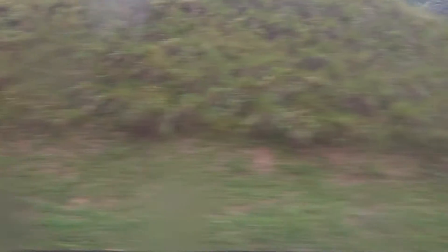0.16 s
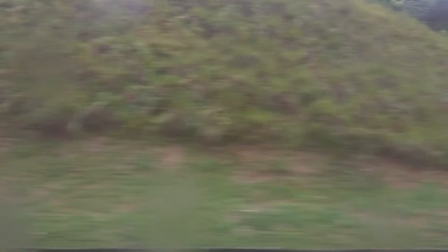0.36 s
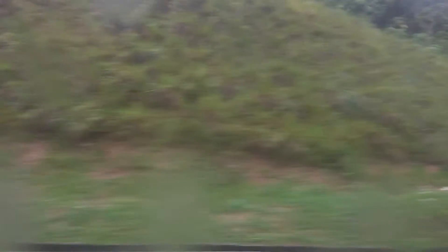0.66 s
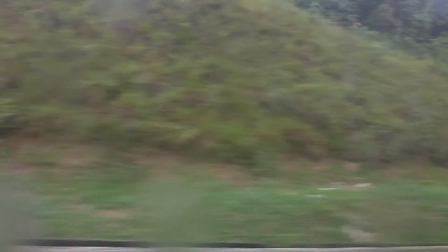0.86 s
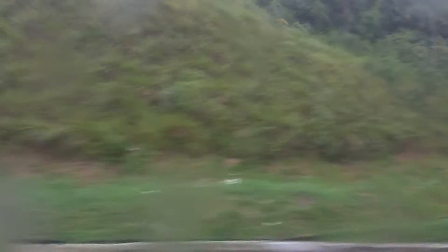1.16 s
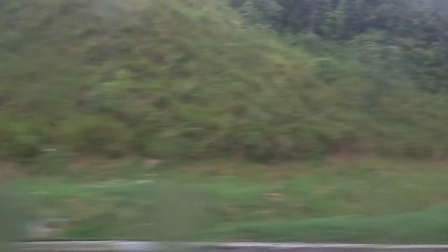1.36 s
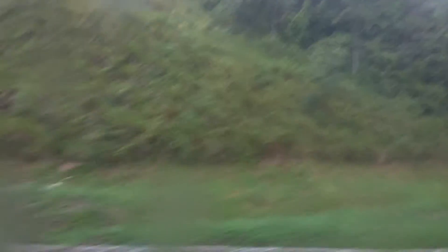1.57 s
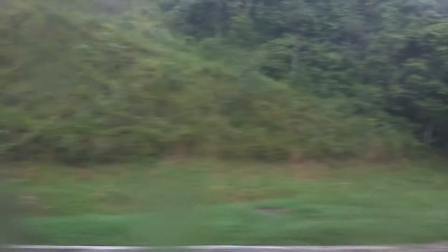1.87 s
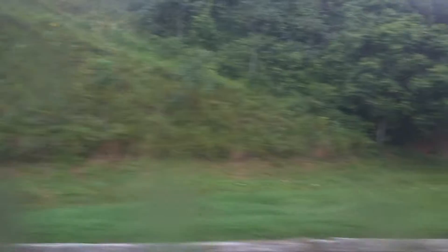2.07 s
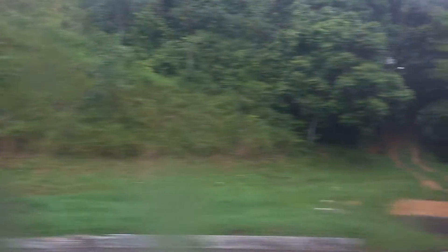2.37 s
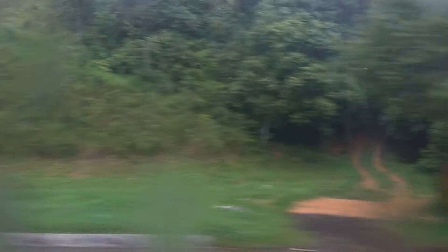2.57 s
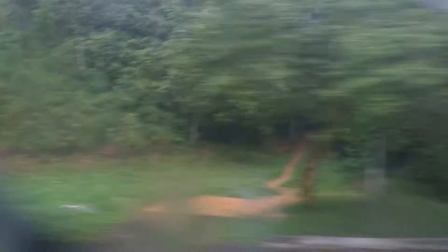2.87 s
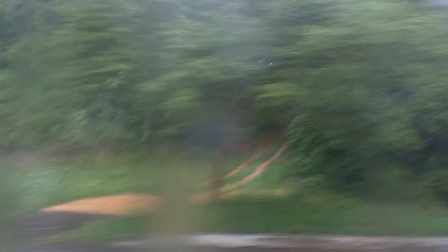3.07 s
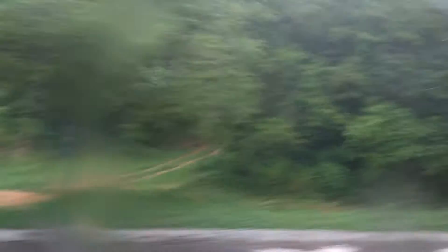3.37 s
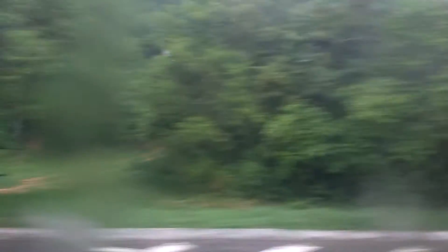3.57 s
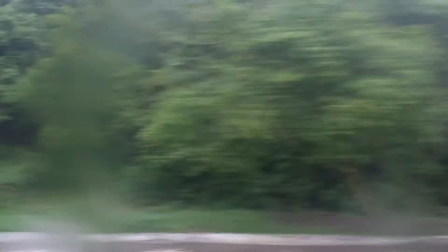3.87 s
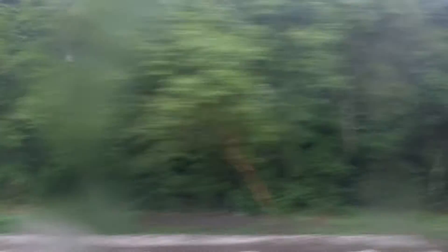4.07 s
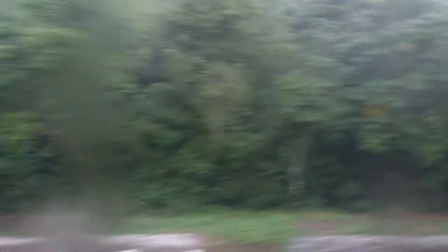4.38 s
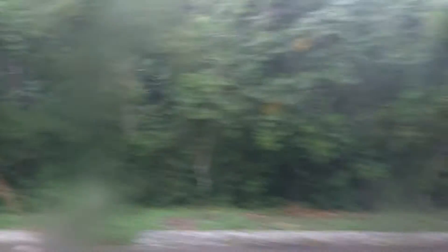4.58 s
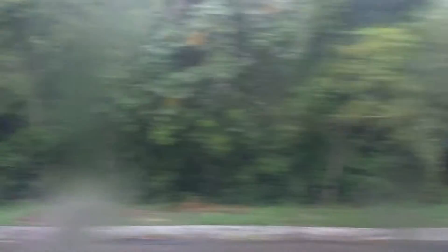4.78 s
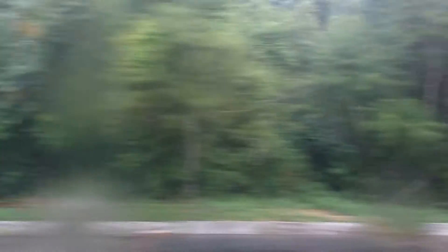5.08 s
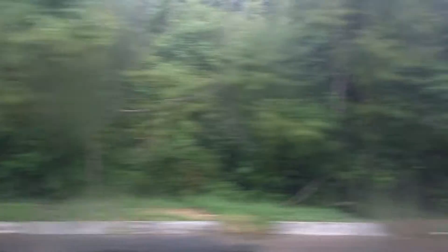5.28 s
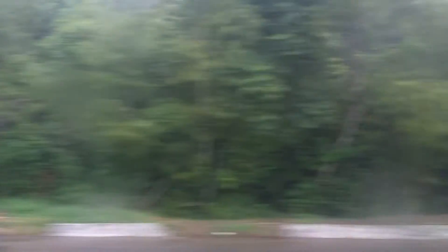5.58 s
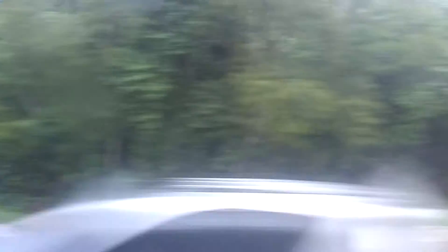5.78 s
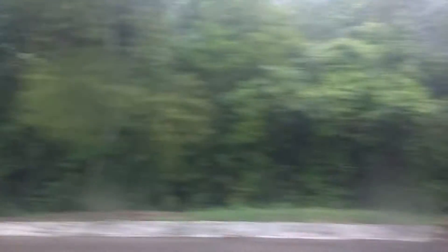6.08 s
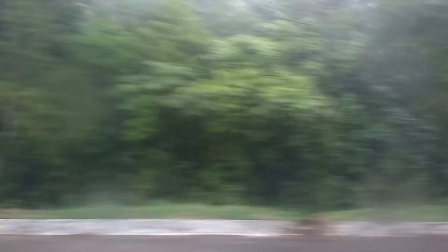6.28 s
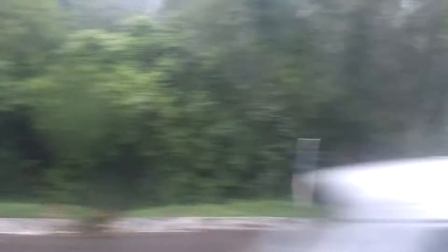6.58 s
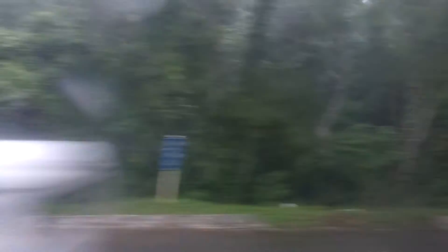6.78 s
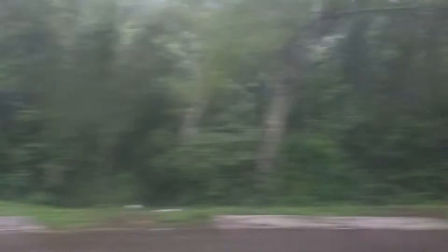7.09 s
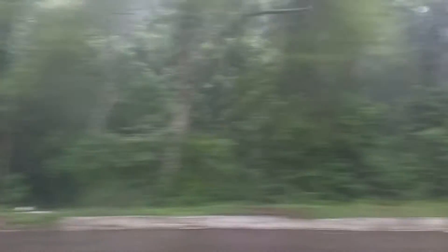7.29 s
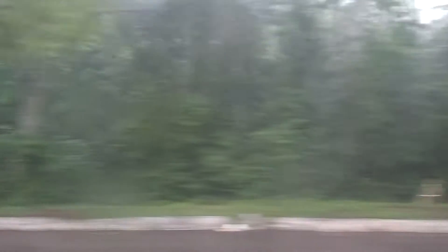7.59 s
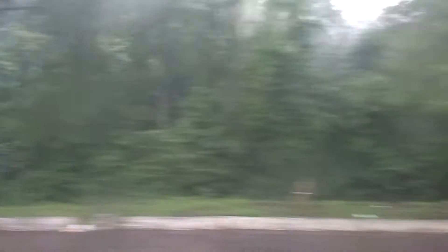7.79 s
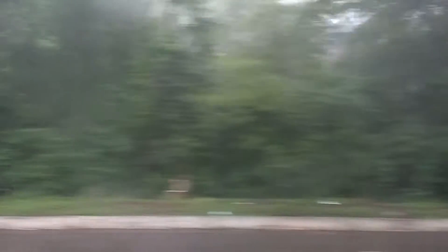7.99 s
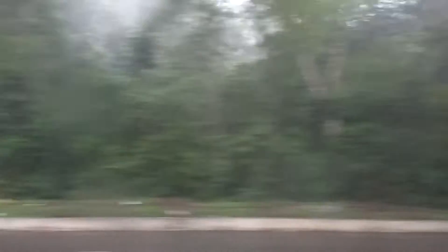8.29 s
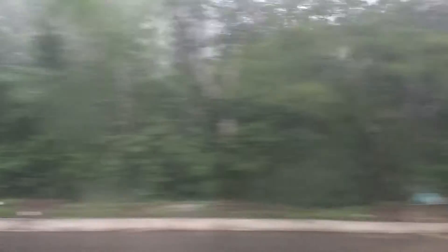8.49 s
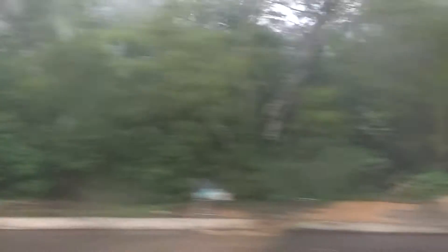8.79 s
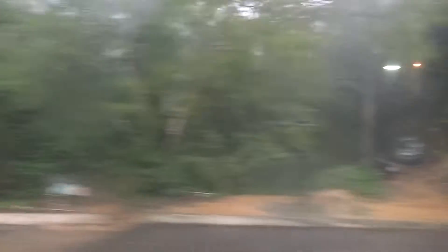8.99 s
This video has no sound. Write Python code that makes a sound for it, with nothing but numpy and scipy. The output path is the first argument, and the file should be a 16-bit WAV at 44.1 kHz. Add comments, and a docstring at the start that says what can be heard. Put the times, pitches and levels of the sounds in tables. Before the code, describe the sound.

A continuous ride inside a diesel vehicle on a wet road. A low boom near 180 Hz, rising slowly to about 195 Hz, beats with a close hum roughly four times a second, above rough engine harmonics and dark tyre rumble with subdued spray. A hard click at 0.3 s briefly pushes the drone down; it recovers within half a second. Rubs and dull knocks gather around 1.6-1.75 s. From 3.1 to 4.6 s handling is busiest, with sharp clicks, knocks and bright rustles, while the engine eases around 3.5-4.4 s. It swells again near 5.2 s. More taps come at 6.5 and 6.9 s, a strong rustle at 7.0, softer rubs at 7.7 and 8.9. A gear whine around 500 Hz grows after 6 s, peaking near 9 s before a sudden dip. Tiny pings, faint right-side crackles and intermittent very high lens whirring run throughout.

```python
"""Inside a diesel vehicle on a wet road: engine orders boom and beat against a hum just above, a gear whine
grows, tyre and spray noise swells in half-octave bands.
A hand-held camera ticks (struck resonances) and rustles (noise bursts), its lens drive sings in the top treble
(steady tones), a small part pings now and then, faint bright ticks crackle on the right.
The camera widens its two microphones by feeding each, late and inverted, into the other."""
import sys
import numpy as np
from scipy import signal
from scipy.fft import rfft, irfft, next_fast_len
from scipy.io import wavfile
from scipy.ndimage import uniform_filter1d

SR = 44100
rng = np.random.default_rng(int(sys.argv[2]) if len(sys.argv) > 2 else 0)


def unload_audio(sound):
    """Save the sound as a 16-bit wav file, at the path given as the first command line argument."""
    columns = np.transpose(np.atleast_2d(sound))
    # keep every value between -1 and 1, then stretch to whole-number steps
    steps = np.round(np.clip(columns, -1, 1) * 32767)
    wavfile.write(sys.argv[1], SR, steps.astype(np.int16))


N = 402633

# Tyre and spray noise spectrum. Each row: frequency in Hz, level in dB per Hz, part not shared by the
# microphones in dB, left minus right in dB.
ROAD_SPECTRUM = [(22, -53, -22, -6), (40, -61.5, -19, -4), (63.7, -49.5, -14, 1.5), (95, -49.5, -15, 0),
                 (132, -45, -23, -1.3), (204, -49, -8.5, -3.5), (307, -59, -5, -1.5),
                 (409, -62.5, -3.5, 0.5), (472, -63.5, -4, -4), (520, -60, -7.5, -5.5),
                 (649, -66.5, -5, -7.5), (1021, -71.5, -1.5, 0), (1615, -82.5, 0.5, -5),
                 (2040, -81.5, 0, -5), (3005, -89.5, -1.5, -4), (5500, -97.5, 8.5, 8),
                 (7400, -102, -7, -22.5), (12000, -101, 1, -6.5), (15000, -99, 19, -3)]
# Air and panel resonances on the road noise. Each row: centre in Hz, width in Hz, gain in dB.
CABIN_RESONANCES = [(656, 70, 2.5), (892, 45, 3.5), (1070, 84, 3.5), (1275, 220, 2.5), (457, 51, -2),
                    (745, 60, 0), (1130, 71, -1)]
# Road noise levels. Each row: time in seconds, body rumble in dB, tyre roar in dB, spray hiss in dB.
ROAD_LEVELS = [(0.0, 1.5, 0, -0.5), (1.0, 3, 0.5, 0), (2.0, -3.5, 0, -1), (3.0, 1, -1, 0.5),
               (4.0, 2.5, -2, -0.5), (5.0, 2.5, 3, 3.5), (6.0, 1.5, 1, 1.5), (7.0, 1.5, 3, 3),
               (8.0, 1.5, 0, 0), (9.13, 6.5, 5, 4.5)]
# Brief swells and lulls of road noise. Each row: centre in seconds, rumble in dB, roar in dB,
# half length in seconds.
ROAD_SWELLS = [(0.0, -13, 2, 0.044), (0.227, 6.5, 3, 0.1), (.46, -8, -1, 0.022), (0.722, 9, 1, 0.035),
               (0.946, 0, 2, 0.092), (1.09, 6.5, 3, 0.046), (1.165, 10.5, 4.5, 0.031), (1.4, -3, -1, .04),
               (1.546, 7, 1, 0.022), (1.647, 9.5, 4, 0.085), (1.752, 8, 5, 0.015), (1.896, 0, -1, 0.017),
               (2.482, 7, 1, 0.022), (2.647, 6.5, 4, 0.094), (2.822, 0, -2, 0.077), (2.907, 5, 2, 0.022),
               (3.113, 10.5, 3.5, 0.056), (3.183, 5, 7, 0.018), (3.458, 2, 5, 0.044), (3.644, -1, 4.5, .03),
               (4.067, 4, 1, 0.029), (4.338, 6.5, 3, 0.024), (4.73, 6.5, 0, .04), (5.263, 0, 3.5, 0.027),
               (5.528, 5, 1.5, 0.052), (5.65, -3, -2, 0.055), (5.85, 2, 2.5, 0.13), (5.983, 2, 2, 0.022),
               (6.457, 7, 1, 0.02), (6.692, -10, -1.5, 0.079), (6.945, 3.5, 1, 0.2), (7.288, -3, -1.5, .06),
               (7.497, 4, 0.5, 0.07), (7.84, 6, 5, 0.092), (8.006, 5.5, 6, 0.068), (8.236, -8, 2, 0.04),
               (8.44, 4, 0.5, 0.026), (8.62, 1, 0.5, 0.026), (8.724, 2, 0, 0.037), (8.966, 0.5, 1.5, 0.078)]
# Sudden level changes of engine and road. Each row: start in seconds, change in dB.
LEVEL_DIPS = [(0.301, -6.5), (1.775, -1.5), (3.225, 0), (3.69, 0.5), (4.35, -2), (4.55, -0.5),
              (9.029, -5.5)]
# Longer runs of the lens drive. Each row: start in seconds, length in seconds.
LENS_RUNS = [(0.029, 0.094), (0.228, 0.081), (0.432, 0.05), (0.989, 0.2), (1.27, 0.054), (1.604, 0.052),
             (2.028, 0.094), (2.789, 0.031), (3.108, 0.032), (4.687, 0.11), (4.908, 0.27), (5.226, 0.051),
             (5.377, 0.13), (5.589, 0.13), (5.789, 0.21), (6.031, 0.068), (6.297, 0.17), (6.821, 0.2),
             (7.216, 0.083), (7.59, 0.042), (7.642, 0.035), (7.787, 0.02), (7.989, 0.018), (8.309, 0.114),
             (8.785, 0.095), (8.909, 0.221)]
# Lens drive tones. Each row: frequency in Hz, level in dB.
LENS_TONES = [(9000, -68.5), (11000, -73), (13000, -60.5), (14000, -71.5), (15000, -58.5)]
# Rubs and rustles. Each row: peak in seconds, rise in seconds, 60 dB decay in seconds, level in dB,
# centre in Hz, left minus right in dB.
RUSTLES = [(0.284, 0.019, 0.19, -54, 7000, -9), (.672, 0.002, 0.14, -46.5, 9000, -13),
           (.742, 0.0022, 0.12, -50, 9000, -7), (1.099, 0.063, 0.27, -51.5, 8000, -11),
           (1.61, 0.0024, 0.2, -39, 7960, -3), (1.647, 0.0035, 0.02, -29.5, 3700, -7),
           (1.668, 0.0067, 0.17, -44.5, 7000, -4), (1.737, 0.0044, 0.12, -41.5, 7000, -3),
           (2.131, .002, .05, -62, 9000, -10), (2.81, 0.0033, 0.083, -58, 9000, -23),
           (3.124, 0.0037, 0.098, -41.5, 9000, -8), (3.254, 0.0026, 0.09, -49.5, 8000, -18),
           (3.443, 0.0025, 0.09, -43, 8000, -9), (3.566, 0.0033, 0.12, -53.5, 8000, -27),
           (3.633, 0.0045, 0.069, -43.5, 9000, -1), (3.799, 0.019, 0.42, -45, 8000, -2),
           (4.022, 0.0016, 0.04, -66, 9000, -6), (4.158, .002, .06, -50, 9000, -6),
           (4.5, 0.0017, 0.16, -39.5, 8000, -6), (4.57, 0.0018, 0.11, -44, 9000, -7),
           (4.75, .002, .06, -56, 9000, -6), (5.51, .002, .06, -56, 8000, -4),
           (5.853, 0.0014, .06, -49, 8000, -6), (7.003, 0.02, 0.097, -34, 4400, 7.5),
           (7.102, 0.004, 0.066, -44.5, 10500, -17), (7.66, 0.079, 0.3, -43.5, 5300, 0),
           (8.084, 0.0027, 0.11, -41.5, 9000, -5), (8.211, 0.0032, 0.066, -49.5, 9800, -17),
           (8.72, 0.013, 0.093, -47, 9000, -2), (8.855, 0.07, 0.38, -44.5, 5400, -3)]
# Pings of a small part. Each row: start in seconds, peak in dB, frequency in Hz.
PINGS = [(0.2124, -33, 4240), (0.6315, -40, 4220), (0.9009, -38, 4200), (1.188, -35, 4130),
         (2.6733, -34, 4160), (4.3226, -31, 4200), (4.7808, -34, 4237), (6.3155, -33.5, 4150),
         (8.9136, -33, 4350)]
# Ticks of the camera shell. Each row: time in seconds, click in dB, then thump and knock in dB re click,
# knock pitch in Hz, brightness in dB re click, left minus right in dB.
SHELL_TICKS = [(0.2992, -0.5, -27, -8, 905, -7.5, 34), (.3373, -38, -8, -20, 700, -16, 14),
               (0.3473, -11, -18, -3, 805, -6.5, 25), (0.431, -44, 8, 17, 695, -6, 13),
               (1.6422, -39, 26, 26, 560, -4, -23), (1.6803, -37, 9, 18, 900, -8, -17),
               (1.717, -37, 22, 16, 600, -8, -19), (3.193, -39, 8, 7, 1000, -8, -12),
               (3.2155, -32, 4, 11, 700, -8, -10), (3.4864, -19, -1, 7.5, 800, 0.5, 24),
               (3.5485, -43, 10, 19.5, 800, -2, -10), (3.661, -11, -6, 2, 765, -7, 24),
               (3.673, -28, 14, 9, 1010, 1, 9), (3.773, -34, 0, 12, 620, 2, -6),
               (3.818, -24, 3, 9.5, 800, -6, -17), (3.8214, -9.5, 4, -0.5, 1030, -10, 33),
               (3.8317, -35, -4, -4, 1500, 4, -1), (3.8690, -39, -7, 0, 1600, -8, 11),
               (3.9263, -26.5, -3, 10, 614, -5, -6), (3.9298, -17.5, 0, -5, 1590, -5, 21),
               (4.5268, -30, 4, 11, 640, -10, -17), (4.531, -20, 2, 7, 1380, -1, 18),
               (4.5320, -17.5, 0, 4, 650, -4, 24), (6.5235, -33, 2, 3, 900, 1, -10),
               (6.5405, -15, -1, 4, 620, -3.5, -33), (6.5421, -29, 9, 19, 530, -10, -20),
               (6.561, -24.5, -3, 2, 950, -9, -11), (6.912, -11.5, -8, -2.5, 820, -12, 21),
               (7.588, -41, 13, 16, 520, 11, -10), (7.7550, -30.5, -4, -1, 700, 8, -21),
               (8.247, -43, 11, 24.5, 595, 0, -12), (8.9928, -24, -7, 6, 620, 10, -22)]
# Shell resonances: click, thump, brightness. Each row: centre in Hz, width in Hz of one filter pass.
SHELL_RESONANCES = [(2250, 2140), (262, 160), (10000, 6100)]
# Engine cycle rate. Each row: time in seconds, rate in Hz.
CYCLE_RATE = [(0.0, 9.778), (0.8, 9.996), (1.6, 10.142), (2.4, 10.297), (3.2, 10.3), (4.0, 10.281),
              (4.8, 10.352), (5.6, 10.412), (6.4, 10.485), (7.2, 10.607), (8.0, 10.715), (8.8, 10.846)]
# Engine levels. Each row: time in seconds, boom in dB, other orders in dB, hum in dB, gear mesh in dB.
ENGINE_LEVELS = [(0.0, -23, -18, -23.5, -49), (0.5, -21, -22, -24.5, -52), (0.9, -25, -20.5, -29, -39),
                 (1.5, -18.5, -21, -27.5, -46), (1.8, -21.5, -22, -21.5, -50),
                 (2.3, -17, -20.5, -21.5, -41), (2.6, -24.5, -22.5, -19, -38.5),
                 (3.0, -22, -22.5, -24.5, -50), (3.5, -28, -21.5, -30.5, -64), (3.9, -27.5, -32, -30, -57),
                 (4.4, -29.5, -27, -20.5, -61), (4.8, -20.5, -21, -21, -39.5),
                 (5.2, -16.5, -20.5, -15.5, -37), (5.9, -18, -18.5, -23.5, -40),
                 (6.4, -19.5, -21.5, -30, -37.5), (7.0, -17.5, -19, -27, -34),
                 (7.5, -20.5, -16.5, -22, -33), (8.0, -20, -18, -26.5, -32),
                 (8.5, -21.5, -18.5, -25, -32.5), (8.8, -19, -18.5, -25, -32),
                 (8.97, -15.5, -15.5, -19.5, -25.5), (9.13, -36, -16, -30, -33.5)]
# Other engine orders. Each entry: multiple of the cycle rate.
ORDER_MULTIPLES = [6, 9, 11, 12, 14, 15, 16, 17, 17.5, 20.25, 23, 24, 26, 30, 36, 40.5, 49, 54, 56, 60]
# The same orders. Each row: share in dB, right minus left in dB, lag of the left in radians.
ORDER_SHARES = [(-13, -1, 0.14), (-13.5, 0, 0.023), (-14, -5, .02), (-8.5, -1.5, 0.3), (-12, -2.5, 0.023),
                (-6.5, 0.5, 0.17), (-12, -4, 0.26), (-16, 0.5, 0.11), (-16.5, -5, 0.13),
                (-18.5, -0.5, 0.092), (-27, -7, .1), (-16.5, 0, 0.099), (-23, -7, .1), (-23, -5.5, 0.2),
                (-24.5, 3.5, 1), (-27, 2.5, 1), (-27.5, -2, 0.36), (-26.5, -3, 0.28), (-30, -1, 0.23),
                (-25.5, -4.5, 0.11)]
# Beat of hum against boom. Each row: time in seconds, hum above boom in Hz.
BEAT_RATE = [(0, 3.55), (1.0, 3.7), (1.2, 4.03), (1.8, 4.03), (2.6, 3.72), (3.6, 3.92), (6, 3.96), (8, 4.1),
             (9.13, 4.3)]

SPRAY_PER_ROAR, RUMBLE_FLUTTER_DB = 0.86, 2
DIP_ATTACK_S, DIP_RECOVERY_S = 0.0027, 0.36
CRACKLE_PER_S, CRACKLE_MIN_DB, CRACKLE_SPREAD_DB, CRACKLE_LOWEST_HZ = 22, -44, 6, 9450
FRAME_S, FIRST_FRAME_S = .04, .029
WHIRR_HZ, WHIRR_WIDTH_HZ, TEETH_PER_S = 9600, 1800, 70
PING_RISE_S, PING_T60_S = 0.00077, .009
THUD_HZ, THUD_WIDTH_HZ, THUD_DB = 137, 130, -0.5  # the grip jolts with every thump
KNOCK_Q, KNOCK_RING_Q, KNOCK_RING_DB, KNOCK_CONTACT_CYCLES = 0.6, 6.9, -18.5, 0.15
RATTLE_DB, RATTLE_HZ, RATTLE_T60_S = -29, 2980, 0.046
BOOM_ORDER, GEAR_ORDER, FADING_ORDER = 18, 47.5, 30.5
FADING_START_DB, FADING_DB_PER_S = -34, -7.5
BEAT_START_TURNS = 0.52
LEFT_DULL_HZ, TOP_HZ = 10100, 15150
CROSS_GAIN, CROSS_S, CROSS_HZ = 0.8, 0.0004022, 8100


def undb(db):
    """dB to gain."""
    return 10 ** (np.asarray(db) / 20)


def curves(table):
    """Each column of a table as a value per sample."""
    s, *columns = np.transpose(table)
    return [np.interp(np.arange(N) / SR, s, column) for column in columns]


def walk(rate_hz):
    """Random levels held 1 / rate_hz seconds and slewed twice; spread about 0.75."""
    hold = int(SR / rate_hz)
    steps = np.repeat(rng.standard_normal(N // hold + 1), hold)
    return 1.017 * uniform_filter1d(uniform_filter1d(steps, hold), hold)[:N]


def band(x, hz, width_hz):
    """One resonance, gain 1 at the centre."""
    return signal.lfilter(*signal.iirpeak(min(hz, SR / 2.5), hz / width_hz, SR), x)


def band_twice(x, hz, width_hz):
    """The same resonance in series with itself: steeper skirts."""
    return band(band(x, hz, width_hz), hz, width_hz)


def unit_peak(x):
    """Scales to a peak of 1."""
    return x / abs(x).max()


def decay(t, t60_s):
    """Exponential decay, 60 dB in t60_s."""
    return 1000. ** (-t / t60_s)


def add(out, x, s, pan_db):
    """Adds a short sound at a time, shared between the microphones; the nearer one gets it whole."""
    i = max(int(s * SR), 0)
    x = x[:N - i]
    out[:, i:i + len(x)] += x * undb([[min(pan_db, 0)], [min(-pan_db, 0)]])


def swells(s, db, half_s):
    """Bell-shaped changes of level, summed, in dB."""
    t = np.arange(0, N, 64) / SR
    bells = np.exp(-((t - s[:, None]) / half_s[:, None]) ** 2)
    return np.interp(np.arange(N) / SR, t, db @ bells)


def dips():
    """Gain that changes suddenly, mostly downwards, and recovers exponentially."""
    t = np.arange(N) / SR
    total_db = 0
    for s, db in LEVEL_DIPS:
        attack = np.clip((t - s) / DIP_ATTACK_S, 0, 1)
        total_db = total_db + db * attack * np.exp(-np.maximum(t - s, 0) / DIP_RECOVERY_S)
    return undb(total_db)


def road():
    """Half-octave bands of noise; long waves reach both microphones alike; bands swell together, flicker alone."""
    size = next_fast_len(N)
    hz = np.maximum(np.fft.rfftfreq(size, 1 / SR), 1)
    at_hz, *columns = np.transpose(ROAD_SPECTRUM)
    db, own_db, pan_db = (np.interp(np.log(hz), np.log(at_hz), c, left=c[0]) for c in columns)
    for centre_hz, width_hz, gain_db in CABIN_RESONANCES:
        db = db + gain_db * np.exp(-(2 * (hz - centre_hz) / width_hz) ** 2)
    shared, left, right = rfft(rng.standard_normal((3, size)))
    own = np.minimum(undb(own_db), 1)
    pair = np.sqrt(1 - own ** 2) * shared + own * np.array([left, right])
    pair *= np.sqrt(SR / 2) * undb(db + np.array([pan_db, -pan_db]) / 2) * (hz > 18)

    rumble_db, roar_db, hiss_db = curves(ROAD_LEVELS)
    s, rumble_swell_db, roar_swell_db, half_s = np.transpose(ROAD_SWELLS)
    swell_db = swells(s, roar_swell_db, half_s)
    rumble_db = rumble_db + swells(s, rumble_swell_db, half_s) + RUMBLE_FLUTTER_DB * walk(20)
    roar_db = roar_db + swell_db + 0.59 * walk(12)
    hiss_db = hiss_db + SPRAY_PER_ROAR * swell_db + 2.0 * walk(28)

    out = 0
    for centre_hz in 22 * 2 ** np.arange(0, 10, .5):
        window = np.cos(np.pi / 2 * np.clip(2 * np.log2(hz / centre_hz), -1, 1)) ** 2
        low = np.interp(np.log(centre_hz), np.log([150, 320]), [1, 0])
        high = np.interp(np.log(centre_hz), np.log([1500, 4000]), [0, 1])
        level_db = low * rumble_db + (1 - low - high) * roar_db + high * hiss_db
        level_db = level_db + 0.78 * walk(9)
        out = out + undb(level_db) * irfft(pair * window, size)[:, :N]
    return out


def crackle():
    """Tiny bright resonant ticks at random moments, each with its own pitch and a short tail."""
    out, t = np.zeros((2, N)), np.arange(int(.012 * SR)) / SR
    for when, size, pitch in rng.random((int(CRACKLE_PER_S * N / SR), 3)):
        hz = CRACKLE_LOWEST_HZ * (1 + .5 * pitch)
        burst = band(rng.standard_normal(len(t)) * decay(t, .008), hz, 0.18 * hz)
        gain_db = CRACKLE_MIN_DB - CRACKLE_SPREAD_DB * np.log(1 - .93 * size)
        add(out, undb(gain_db) * burst, when * N / SR, -14)
    return out


def lens():
    """Focus drive by the right microphone: long runs, nudges on many picture frames; gear teeth whirr and tick."""
    t, on = np.arange(N) / SR, np.zeros(N)
    frames_s = np.arange(FIRST_FRAME_S, N / SR, FRAME_S)
    nudges = zip(frames_s, rng.choice([0, .008, .017], len(frames_s), p=[.4, .4, .2]))
    for s, length_s in [*LENS_RUNS, *nudges]:
        on[int(s * SR):int((s + length_s) * SR)] = 1
    on = uniform_filter1d(on, int(0.0022 * SR)) * undb(0.85 * walk(4.04))
    tones = sum(np.sqrt(2) * undb(db) * np.sin(2 * np.pi * hz * t) for hz, db in LENS_TONES)
    strikes = (rng.random(N) < TEETH_PER_S / SR) * rng.standard_normal(N)
    teeth = undb(-24.0) * band(strikes, WHIRR_HZ, WHIRR_WIDTH_HZ)
    whirr = undb(-47.5) * band_twice(rng.standard_normal(N), WHIRR_HZ, WHIRR_WIDTH_HZ)
    return on * (tones + teeth + whirr) * undb([[-26], [0]])


def rustles():
    """Rubbing skin: bursts of gritty wide noise, independent at each microphone."""
    out = np.zeros((2, N))
    for s, rise_s, t60_s, db, hz, pan_db in RUSTLES:
        u = np.arange(-3 * rise_s, t60_s, 1 / SR)
        shape = np.where(u < 0, np.exp(-(u / rise_s) ** 2), decay(np.maximum(u, 0), t60_s))
        for side_db in (60, -60):  # each microphone hears its own patch of skin
            grain_db = 1.7 * np.repeat(rng.standard_normal(len(u) // 60 + 1), 60)[:len(u)]
            noise = band(rng.standard_normal(len(u)) * undb(grain_db), hz, 1.5 * hz)
            gain = undb(db + np.sign(side_db) * pan_db / 2)
            add(out, gain * shape * noise / noise.std(), s + u[0], side_db)
    return out


def pings():
    """A small part rings: decaying sines, stronger on the left."""
    out, t = np.zeros((2, N)), np.arange(int(.03 * SR)) / SR
    envelope = np.minimum(t / PING_RISE_S, 1) * decay(t, PING_T60_S)
    for s, db, hz in PINGS:
        add(out, undb(db) * np.sin(2 * np.pi * hz * t) * envelope, s, 6.0)
    return out


def knock_sound(t, hz):
    """A dull blow at its own pitch with a short ring after it."""
    soft_push = -np.exp(-(t * hz / KNOCK_CONTACT_CYCLES - 2) ** 2)
    blow = band_twice(soft_push, hz, hz / KNOCK_Q)
    ring = band(blow, hz, hz / KNOCK_RING_Q)
    return unit_peak(blow) + undb(KNOCK_RING_DB) * unit_peak(ring)


def ticks():
    """Taps ring the shell's broad resonances, add a knock and leave loose parts chattering."""
    out, t = np.zeros((2, N)), np.arange(int(.03 * SR)) / SR
    push = -np.exp(-(t - .0002) ** 2 / .00004 ** 2)
    click, thump, bright = (band_twice(push, hz, width_hz) for hz, width_hz in SHELL_RESONANCES)
    thud = band_twice(push, THUD_HZ, THUD_WIDTH_HZ)
    thump = unit_peak(thump) + undb(THUD_DB) * unit_peak(thud)
    click, thump, bright = unit_peak(click), unit_peak(thump), unit_peak(bright)
    for s, db, thump_db, knock_db, hz, bright_db, pan_db in SHELL_TICKS:
        side = np.sign(pan_db)  # a tap on the right of the shell pushes the other way
        shell = undb(db) * click + undb(db + thump_db) * thump + undb(db + bright_db) * bright
        add(out, side * shell, s, pan_db)
        knock = undb(db + knock_db) * knock_sound(t, hz)
        add(out, side * knock, s - 1.5 * KNOCK_CONTACT_CYCLES / hz, pan_db)
        chatter = band(rng.standard_normal(len(t)), RATTLE_HZ, 0.94 * RATTLE_HZ) * decay(t, RATTLE_T60_S)
        add(out, undb(db + RATTLE_DB) * chatter, s + 0.0007, pan_db)
    return out


def tone(phase, db, right_db, lag_rad):
    """A sine at both microphones, the left lagging; db is the RMS level at the left."""
    return np.sqrt(2) * undb(db) * np.array([np.sin(phase - lag_rad), undb(right_db) * np.sin(phase)])


def engine():
    """Orders of the engine cycle; the cabin booms on one, a hum just above beats with it, a gear mesh whines."""
    boom_db, rest_db, hum_db, gear_db = curves(ENGINE_LEVELS)
    beat_turns = BEAT_START_TURNS + np.cumsum(curves(BEAT_RATE)[0]) / SR
    cycle = 2 * np.pi * np.cumsum(curves(CYCLE_RATE)[0]) / SR
    boom_phase = BOOM_ORDER * cycle
    out = tone(boom_phase, boom_db + 0.3 * walk(8.4), -0.95, 0.32)
    out += tone(boom_phase + 2 * np.pi * beat_turns, hum_db + 1.3 * walk(14.0), 0.12, 0.2)
    out += tone(GEAR_ORDER * cycle + 0.08 * walk(5), gear_db + 0.9 * walk(6), -2.5, 0.3)
    # a hum near 300 Hz dies away
    fading_db = FADING_START_DB + FADING_DB_PER_S * np.arange(N) / SR + 2.5 * walk(16.0)
    out += tone(FADING_ORDER * cycle, fading_db, -2.4, 0.17)
    for order, (share_db, right_db, lag_rad) in zip(ORDER_MULTIPLES, ORDER_SHARES):
        # uneven firing blurs the high orders, which come up with the load on the gears
        load_db = 0.15 * (gear_db - gear_db.max()) * (order > 32)
        phase = order * (cycle + 0.047 * walk(8)) + 2 * np.pi * rng.random()
        flutter_db = (1.6 + .07 * order) * walk(7)
        out += tone(phase, rest_db + share_db + load_db + flutter_db, right_db, lag_rad)
    return out


def scene():
    """Everything as it arrives at the two microphone ports."""
    vehicle = (road() + engine()) * dips()
    camera = lens() + rustles() + pings() + ticks()
    return vehicle + camera + crackle()


def record(dry):
    """The left port is duller; each side loses a late, dulled copy of the other, widening the image; top cut."""
    size = next_fast_len(N + 1000)
    hz = np.fft.rfftfreq(size, 1 / SR)
    ports = rfft(dry, size)
    ports[0] /= np.sqrt(1 + (hz / LEFT_DULL_HZ) ** 6)
    delay = np.exp(-2j * np.pi * hz * CROSS_S)
    cross = CROSS_GAIN * delay / np.sqrt(1 + (hz / CROSS_HZ) ** 14)
    # above the top of the band only a trace gets through
    shelf_db = np.interp(hz, [TOP_HZ, TOP_HZ + 350], [0, -28])
    wide = irfft((ports - ports[::-1] * cross) * undb(shelf_db), size)[:, :N]
    return signal.sosfilt(signal.ellip(8, .2, 70, 16450, fs=SR, output="sos"), wide)


dry = scene()
out = record(dry)
unload_audio(out)
```